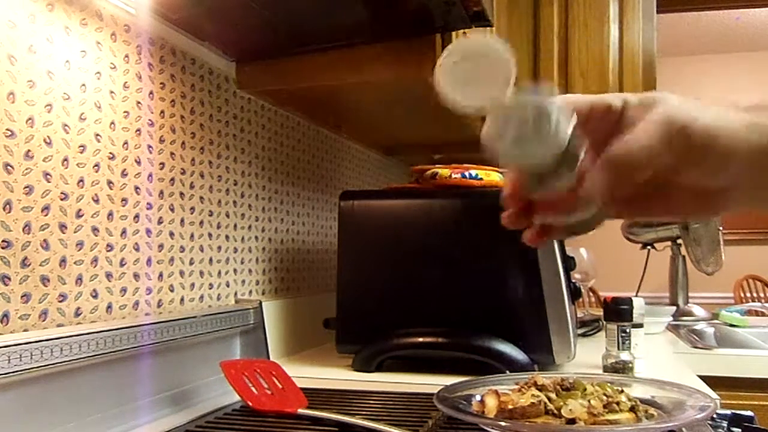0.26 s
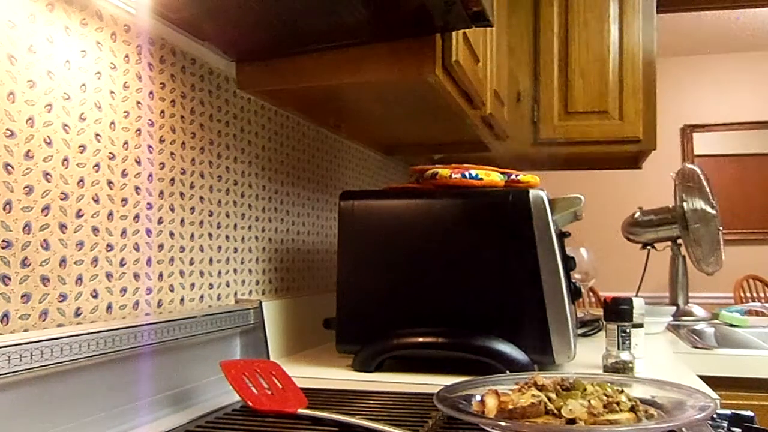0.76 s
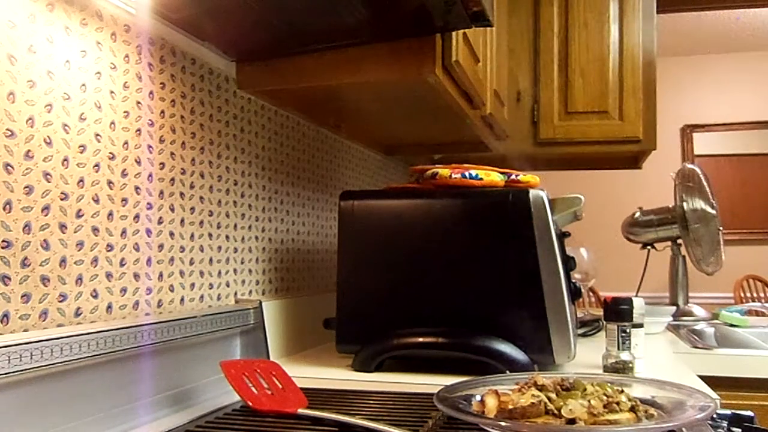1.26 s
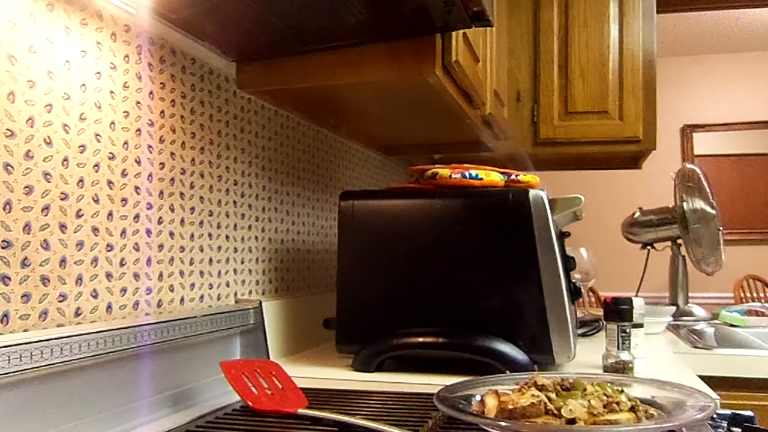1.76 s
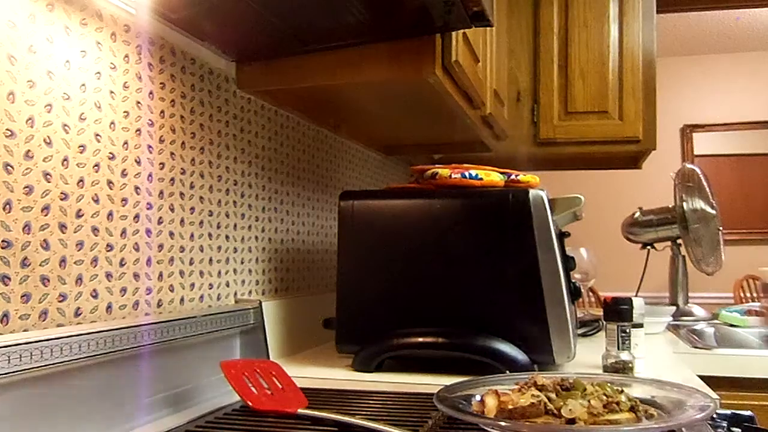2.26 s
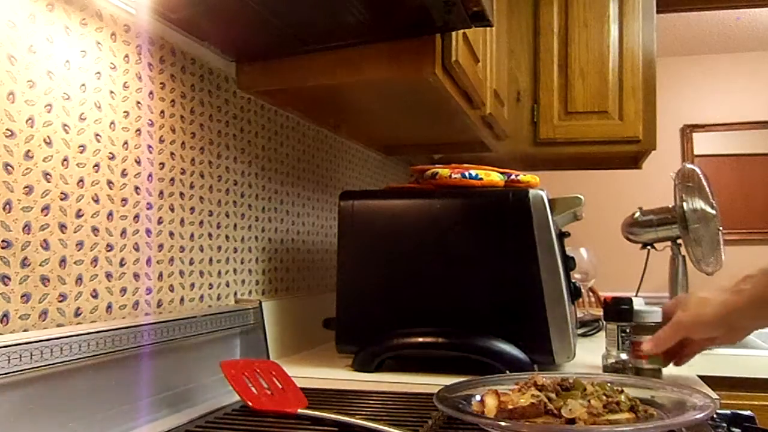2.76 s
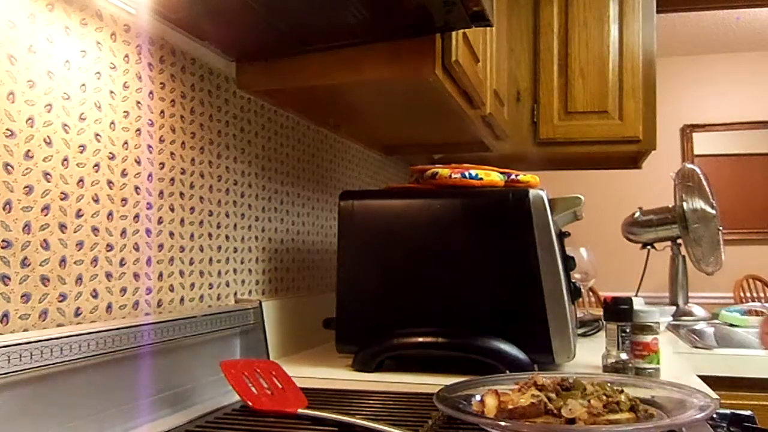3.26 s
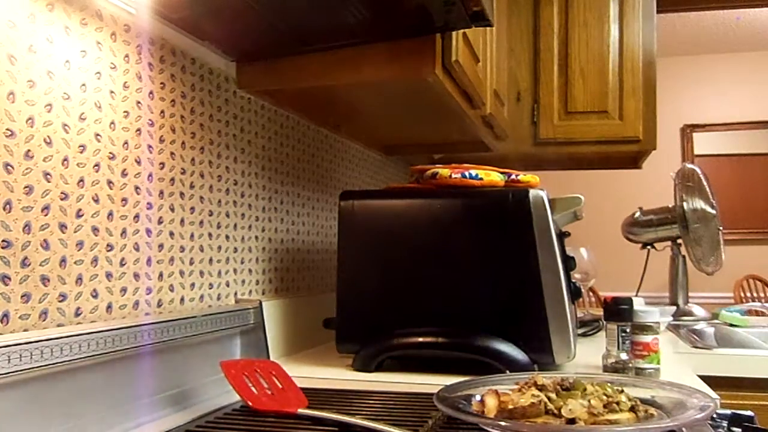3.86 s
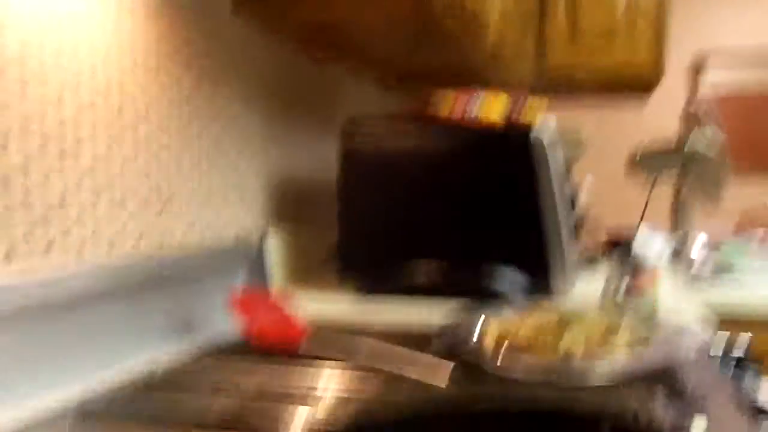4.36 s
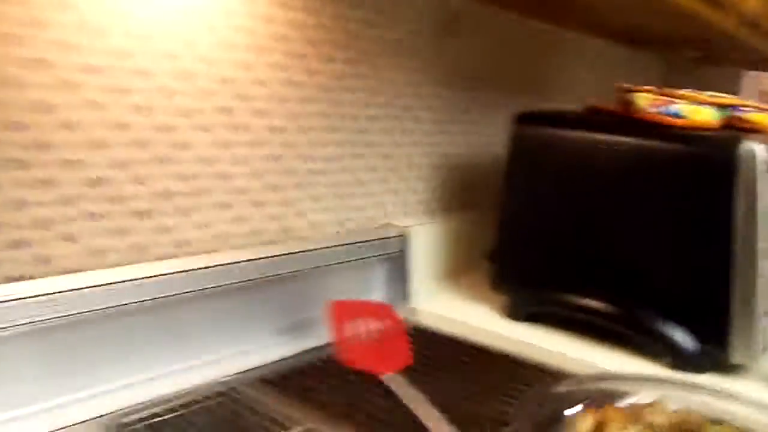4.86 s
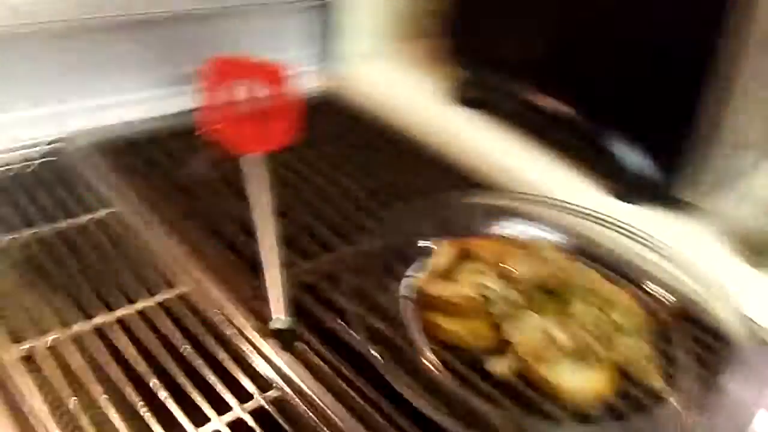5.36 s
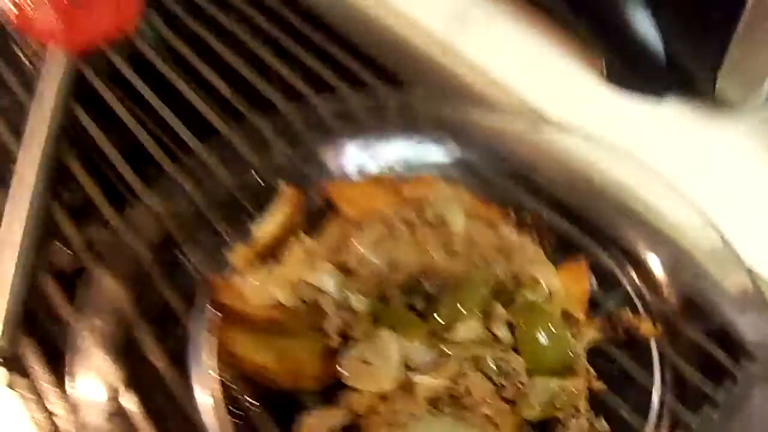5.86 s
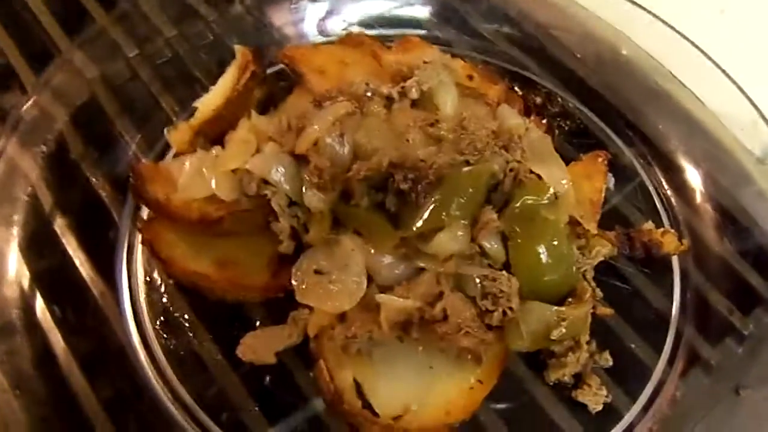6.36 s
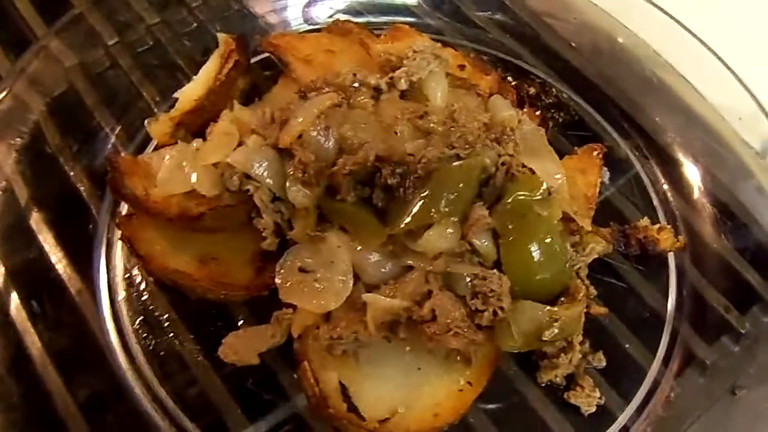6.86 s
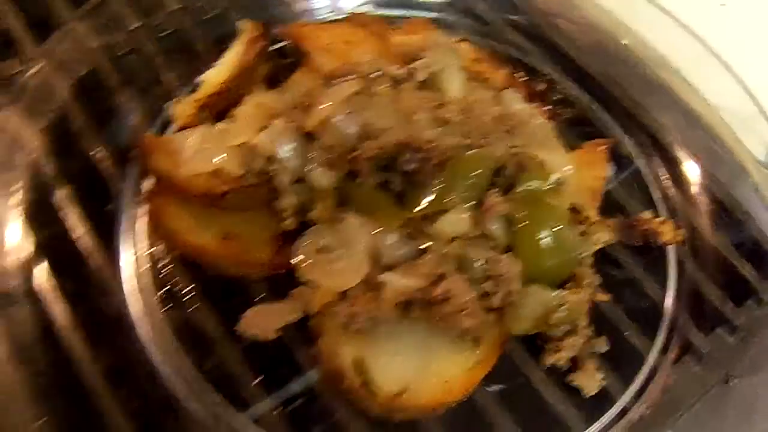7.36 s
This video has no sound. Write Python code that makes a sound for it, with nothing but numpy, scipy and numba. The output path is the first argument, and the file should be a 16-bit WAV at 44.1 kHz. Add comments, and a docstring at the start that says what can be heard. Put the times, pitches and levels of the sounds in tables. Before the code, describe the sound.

A kitchen fan hums steadily throughout, with a faint sizzle of eggs frying and a low rumble from the hand-held microphone. Fingers rustle softly on plastic at first. At about 0.9 seconds a spice shaker's lid snaps loudly close by, ringing briefly, and at 1.1 seconds it clicks shut; these are the loudest sounds. The background then dips and recovers by about 4 seconds. From 1.4 to 2.5 seconds trapped steam chatters faintly in the pan in quick, even puffs. At 2.6 seconds the shaker is set on the counter with a light knock and thud. Small spits of fat grow louder, several a second. From 4.2 to 6 seconds the microphone is carried over the stove, with rubs, sharp finger ticks and two dull bumps near 5.1 and 5.4 seconds. The spits turn brighter and continue over the hum until the end, at around 7.6 seconds.

```python
"""A kitchen fan hums and a hand-held camera rumbles; eggs sizzle faintly, steam spitting through the fat.
Fingers rustle. At 0.86 s a spice shaker's plastic lid snaps loudly, then clicks home close by; the
overload ducks the automatic gain for about 3 s. From 1.4 s trapped steam chatters in the pan, and at
2.6 s the shaker is set on the counter. The spits grow louder, several a second. From 4.25 s the camera
is carried over the stove, with rubs, ticks and two bumps, and the spits turn brighter."""
import sys
import numpy as np
from scipy import signal
from scipy.fft import rfft, irfft
from scipy.io import wavfile
from scipy.ndimage import uniform_filter1d
from numba import njit

SR = 44100
rng = np.random.default_rng(int(sys.argv[2]) if len(sys.argv) > 2 else 0)


def log_audio(samples):
    """Write samples as a 16-bit WAV file to the path given in sys.argv[1]."""
    # one column per channel
    frames = np.atleast_2d(samples).T
    # limit to full scale, then quantise
    limited = np.clip(frames, -1, 1)
    pcm = np.round(limited * 32767).astype(np.int16)
    wavfile.write(sys.argv[1], SR, pcm)


N = 335424
T = np.arange(N) / SR

# Kitchen reverberation. Each row: frequency in Hz, t60 in seconds.
ROOM_DECAY = [(100, 0.36), (500, 0.55), (2000, 0.47), (4000, .48), (8000, 0.43), (14000, 0.37)]
# Fan tones. Each row: multiple of the shaft rate, level by the counter in dB, level over the stove in dB.
FAN_HARMONICS = [(1, -16.5, -14), (9, -19, -11), (10, -8, -28), (11, -14, -32), (12, -16.5, -31),
                 (14, -28.5, -23), (17, -17.5, -18.5), (18, -19, -26)]
# Noise colours. Each row: frequency in Hz, relative spectral density in dB.
FAN_AIR_COLOUR = [(20, -1), (45, -1), (100, -3.5), (250, -5.5), (400, -1.5), (520, -6), (700, -7.5),
                  (900, -11), (1100, -10.5), (1400, -22), (2500, -24.5), (8000, -46.5)]
SIZZLE_COUNTER_COLOUR = [(500, -23.5), (1300, -5.5), (1750, 2), (2400, -0.5), (4200, 1), (5500, -5.5),
                         (9000, -6.5), (14000, -9.5)]
SIZZLE_STOVE_COLOUR = [(500, -17.5), (1300, 0), (1750, 0.5), (4200, -1.5), (5500, -2.5), (9500, -5),
                       (14000, -5)]
MIDDLE_COLOUR = [(300, -31), (1100, 0.5), (1650, 2), (2200, -3), (3100, -0.5), (4200, -4), (5500, -5.5),
                 (12000, -37.5)]
TREBLE_COLOUR = [(1500, -36), (4000, -7), (5500, -2.5), (7500, -3), (10000, -3.5), (12000, -9),
                 (14000, -16)]
SNAP_COLOUR = [(50, -31), (150, -19.5), (240, -3.5), (350, 3.5), (540, -7.5), (800, -4.5), (1400, -4),
               (2100, -1.5), (3000, -4.5), (3800, 8), (4250, 1), (4900, -6.5), (5800, -7), (7200, -8),
               (10500, -5.5), (14000, -12)]
CLICK_COLOUR = [(50, -21), (200, -5.5), (460, -1), (800, -6), (1600, 2.5), (2400, 0), (3000, -6.5),
                (3700, 0), (5000, -5), (7000, -10), (9000, -11.5), (14000, -21)]
KNOCK_COLOUR = [(50, -30), (300, -12), (900, -8), (1250, -13), (1600, 1.5), (2400, -13), (2800, 2),
                (3100, 9), (3400, -5), (3800, -1), (4800, -10), (6200, -17), (7700, -14.5), (14000, -33)]
THUD_COLOUR = [(50, -14), (130, -14), (200, -3), (300, -5), (400, -6), (520, 4), (800, -19), (1500, -25)]
# Hand on shaker and camera. Each row: peak time in seconds, level in dB, half length in seconds,
# treble over middle in dB.
HAND_RUSTLES = [(0.14, -46, .014, 0), (0.368, -42.3, 0.026, 7), (.607, -44, .014, -7),
                (.685, -49, 0.014, 3), (0.835, -45.5, .02, -6), (4.28, -50, .048, -8),
                (5.223, -45.5, .047, 2), (5.365, -36, 0.032, 2.5), (5.997, -44.5, .06, 9)]
# Clear spits of fat. Each row: time in seconds, level in dB, spray from 0 (big bubble) to 1 (fine jet).
CLEAR_SPITS = [(1.293, -44.5, 0.043), (1.558, -46, .1), (1.9727, -48, 0.15), (2.1937, -50.5, .1),
               (2.4571, -48.5, .1), (2.89, -49, .4), (2.9802, -41, 0), (3.171, -41.5, 0.038),
               (3.3465, -49.5, 0.41), (3.474, -41.5, 0.086), (3.7557, -41, 0.03), (3.9507, -42, 0),
               (4.029, -45.5, 0.092), (4.256, -42, 0), (4.451, -43.5, 0.076), (4.6554, -43.5, .1),
               (4.906, -43.5, 0.22), (4.9949, -46, 0.045), (5.2706, -44, 0), (5.468, -43, 0.086),
               (5.622, -41.5, 0.063), (5.8533, -40.5, 0.21), (6.0879, -40, 0.25), (6.3093, -41.5, 1),
               (6.349, -45.5, 0), (6.422, -46.5, 0.056), (6.5473, -42, 0.8), (6.708, -43, 0),
               (6.7665, -44, 0.98), (7.0045, -37, 0.38), (7.2253, -42.5, 0.92), (7.384, -43, 0),
               (7.463, -43.5, 0.46), (7.574, -47.5, 0.37)]
# Pan resonances. Each row: frequency in Hz, bandwidth in Hz, gain in dB.
PAN_RESONANCES = [(1705, 78, 1), (2235, 94, 4), (2720, 320, 0), (3120, 55, 0), (3800, 140, -3.5),
                  (6720, 100, 3), (7440, 96, 0.5), (7970, 110, -0.5), (10900, 91, -11.5)]
# Modes of the shaker's lid and jar. Each row: frequency in Hz, relative level in dB, t60 in seconds.
LID_RING = [(252, 2, .06), (366, 3, .13), (2435, -12, .45), (2630, -8, .27), (2887, -9, .27),
            (3230, -13, .35), (3315, -5, .24), (3558, -11, .3), (3690, 6, .26), (3845, -3, .42),
            (3938, 4, .27), (4147, 1, .3), (4335, -7, .26), (9846, -6, .16), (10141, -6, .16)]
JAR_RING = [(183, -11, .2), (256, -5, .17), (334, -8, .2), (510, 0, .15), (705, -11, .15), (1604, -2, .12),
            (2847, -4, .09), (3006, -3, .1), (3044, 4, .12), (3113, -3, .13), (3757, -1, .1),
            (4134, -8, .09), (7700, -12, .04)]
# Taps on the camera body. Each row: start in seconds, level in dB, pitch in Hz, t60 in seconds.
FINGER_TICKS = [(4.2432, -29.5, 1600, 0.02), (4.683, -30, 4200, 0.0087), (4.8115, -35, 4200, 0.006),
                (5.0706, -28, 3300, 0.012), (5.1772, -23, 4800, 0.008), (5.606, -28.5, 2350, 0.012)]
BODY_BUMPS = [(5.0707, -18, 95, 0.03), (5.365, -14, 138, 0.021)]


def undb(db):
    return 10 ** (np.asarray(db) / 20)


def unit_rms(x):
    return x / np.sqrt(np.mean(x ** 2))


def fade(t, t60_s):
    return undb(-60 * t / t60_s)


def add(out, start_s, x):
    i = int(start_s * SR)
    out[i:i + len(x)] += x[:N - i]


def tint(x, colour, size=4096):
    """Minimum-phase colour filter that keeps the power of white noise."""
    hz, db = np.transpose(colour)
    bins_hz = np.maximum(np.fft.rfftfreq(size, 1 / SR), 1)
    gain = undb(np.interp(np.log(bins_hz), np.log(hz), db))
    cepstrum = irfft(np.log(gain))
    cepstrum[1:size // 2] *= 2
    cepstrum[size // 2 + 1:] = 0
    response = irfft(np.exp(rfft(cepstrum)))
    return signal.fftconvolve(x, response / np.linalg.norm(response))[:len(x)]


def drift(rate_hz):
    """Smooth random curve, unit RMS."""
    hold = int(SR / rate_hz)
    steps = np.repeat(rng.standard_normal(N // hold + 1), hold)
    return unit_rms(uniform_filter1d(uniform_filter1d(steps, hold), hold)[:N])


def crackle(rate_hz, spread_db):
    """Random impulses; the spread makes a few far louder."""
    size = undb(spread_db * np.minimum(rng.exponential(size=N), 5))
    return unit_rms((rng.random(N) < rate_hz / SR) * size * rng.standard_normal(N))


def split_power(power, treble_db):
    """Middle and treble shares of a power curve."""
    middle_share = 1 / (1 + undb(treble_db) ** 2)
    return np.outer([middle_share, 1 - middle_share], power)


def hiss(powers, rate_hz, spread_db):
    """Fine grains following a middle and a treble power curve."""
    return sum(tint(np.sqrt(power) * crackle(rate_hz, spread_db), colour)
               for power, colour in zip(powers, (MIDDLE_COLOUR, TREBLE_COLOUR)))


def kitchen(x, wet_db, gap_s=0.0025):
    """Direct sound plus a diffuse tail, longest in the mids."""
    hz, t60_s = np.transpose(ROOM_DECAY)
    bins_hz, frames_s, cells = signal.stft(rng.standard_normal(SR), SR)
    cells *= fade(frames_s, np.interp(bins_hz, hz, t60_s)[:, None])
    tail = signal.istft(cells, SR)[1][:SR] * np.clip(T[:SR] / gap_s - 1, 0, 1)
    return x + undb(wet_db) * signal.fftconvolve(x, tail / np.linalg.norm(tail))[:len(x)]


def camera_move(start_s=4.25, length_s=1.1):
    """Place (0 by the counter, 1 over the stove) and speed (0 to 1)."""
    angle = np.pi * np.clip((T - start_s) / length_s, 0, 1)
    return (1 - np.cos(angle)) / 2, np.sin(angle)


def fan(place, shaft_hz=37.45, repeat=0.42, whistle_hz=7860):
    """Turbulence that partly repeats each turn, shaft harmonics and a faint whistle."""
    turn_delay = np.exp(-2j * np.pi * np.fft.rfftfreq(N, 1 / SR) / shaft_hz)
    turbulence = irfft(rfft(rng.standard_normal(N)) / (1 - repeat * turn_delay), N)
    air = unit_rms(tint(turbulence, FAN_AIR_COLOUR))
    angle = 2 * np.pi * np.cumsum(shaft_hz * (1 + 0.00397 * drift(3))) / SR
    air *= 1 + 0.21 * np.cos(angle)
    tones = np.zeros(N)
    for multiple, counter_db, stove_db in FAN_HARMONICS:
        level_db = counter_db + (stove_db - counter_db) * place + 2.5 * drift(8.3)
        tones += undb(level_db) * np.cos(multiple * angle + 0.59 * drift(25))
    whistle = undb(-30) * drift(150) * np.sin(2 * np.pi * whistle_hz * T)
    return undb(-1) * air + np.sqrt(2) * tones + whistle


def sizzle(place, flare_rate_hz=16, flare_depth=0.55, flare_t60_s=0.045):
    """Minute bubbles burst in a bed that flares briefly; its colour follows the camera's place."""
    starts = (rng.random(N) < flare_rate_hz / SR) * np.minimum(rng.exponential(size=N), 2)
    flares = signal.fftconvolve(starts, fade(T[:SR // 10], flare_t60_s))[:N]
    grains = crackle(rate_hz=6000, spread_db=2.5) * (1 + flare_depth * flares) * undb(0.5 * drift(9.4))
    bed = (1 - place) * tint(grains, SIZZLE_COUNTER_COLOUR) + place * tint(grains, SIZZLE_STOVE_COLOUR)
    return unit_rms(kitchen(bed, wet_db=-1.5))


def hand_rumble(place, speed, rest_db=-52.5, reach_db=3.2, carry_db=5):
    """The hand shakes the camera body, more with the arm stretched or moving."""
    colour = [(20, -5.5), (60, -0.5), (160, -5.5), (300, -10), (800, -11), (2000, -31.5)]
    rumble = tint(rng.standard_normal(N), colour)
    return rumble * undb(rest_db + reach_db * place + carry_db * speed + 2 * drift(9))


def rustles():
    """Skin slides over plastic in short smooth swells."""
    powers = sum(split_power(undb(db) ** 2 * np.exp(-((T - peak_s) / half_s) ** 2), treble_db)
                 for peak_s, db, half_s, treble_db in HAND_RUSTLES)
    friction = hiss(powers, rate_hz=22000, spread_db=1)
    return kitchen(tint(friction, [(1000, -1), (8000, 0.5), (13000, 5.5)]), wet_db=-8)


def faint_spits(rate_hz=2.5, mean_db=-53.5, spread_db=1.5):
    """Random small spits, as rows like CLEAR_SPITS."""
    wait, size, spray = rng.random((60, 3)).T
    times_s = np.cumsum(2 * wait / rate_hz)
    levels_db = mean_db + spread_db * (2 * size - 1)
    return [row for row in zip(times_s, levels_db, spray) if 0.01 < row[0] < T[-1]]


def pan(x):
    """The pan rings with bursts inside it."""
    return sum(undb(db) * signal.lfilter(*signal.iirpeak(hz, hz / width_hz, SR), x)
               for hz, width_hz, db in PAN_RESONANCES)


def spits(place, ear_window_s=0.021, escape_t60_s=0.076, lead_s=0.002, ping_hz=3020, stove_db=7.5):
    """Steam breaks through the fat: a grainy burst and a bubble ping. Fine jets are short and bright."""
    powers, pings, t = np.zeros((2, N)), np.zeros(N), T[:SR // 10]
    pop = 1 + 0.96 * fade(t, t60_s=0.018)
    for time_s, db, spray in CLEAR_SPITS + faint_spits():
        length_s = 0.015 / 2 ** (1.6 * spray)
        # Over the stove the pan's rim no longer shades the treble.
        treble_db = -6.5 + 17 * spray + stove_db * place[int(time_s * SR)]
        power = (pop * fade(np.maximum(t - length_s, 0), escape_t60_s)) ** 2
        energy = undb(db) ** 2 * ear_window_s * SR
        for register, part in zip(powers, split_power(energy * power / power.sum(), treble_db)):
            add(register, time_s - lead_s, part)
        pitch_hz = ping_hz * (1 + 0.03 * rng.standard_normal())
        ping = fade(t, t60_s=0.025) * np.sin(2 * np.pi * pitch_hz * t)
        middle_share = 1 / (1 + undb(treble_db) ** 2)
        add(pings, time_s - lead_s, undb(db + 7) * middle_share * ping)
    bursts = hiss(powers, rate_hz=6000, spread_db=0)
    return kitchen(bursts + undb(-1.5) * pan(bursts) + pings, wet_db=-6.5)


def impact(start_s, colour, db, t60_s, scatter_db, scatter_t60_s, wet_db, attack_s=0.0008):
    """A sharp crack, then its scatter off cabinets and counter."""
    out, t = np.zeros(N), T[:SR // 2]
    decay = fade(t, t60_s) + undb(scatter_db) * fade(t, scatter_t60_s)
    burst = decay * np.minimum(t / attack_s, 1) * np.sign(rng.standard_normal(len(t)))
    add(out, start_s, undb(db) * tint(burst, colour))
    return kitchen(out, wet_db)


def ring(start_s, modes, db):
    """Struck modes decay as sines."""
    out, t = np.zeros(N), T[:SR]
    for hz, mode_db, t60_s in modes:
        add(out, start_s, undb(db + mode_db) * fade(t, t60_s) * np.sin(2 * np.pi * hz * t))
    return out


def shaker(snap_s=0.8572, click_s=1.0627, down_s=2.6146, counter_lag_s=0.00702):
    """The lid snaps and clicks home; the jar knocks on the counter, which answers with a thud."""
    snap = impact(snap_s, SNAP_COLOUR, db=0.5, t60_s=0.058,
                  scatter_db=-16.5, scatter_t60_s=0.14, wet_db=-8)
    click = impact(click_s, CLICK_COLOUR, db=2, t60_s=0.011,
                   scatter_db=-14, scatter_t60_s=0.095, wet_db=-14)
    knock = impact(down_s, KNOCK_COLOUR, db=-20, t60_s=0.041,
                   scatter_db=-6.5, scatter_t60_s=0.35, wet_db=-9)
    thud = impact(down_s + counter_lag_s, THUD_COLOUR, db=-32, t60_s=0.13,
                  scatter_db=-5.5, scatter_t60_s=0.22, wet_db=-9)
    lid = ring(snap_s, LID_RING, db=-22) + ring(click_s, LID_RING, db=-44)
    jar = ring(down_s, JAR_RING, db=-25)
    return snap + click + knock + thud + kitchen(lid + jar, wet_db=-13)


def steam_chatter(start_s=1.415, rate_hz=19.3, count=22, run_db=-53.5, jitter_s=0.002):
    """Trapped steam escapes in a nearly even run of faint puffs that ring the pan."""
    power, t = np.zeros(N), T[:SR // 10]
    for k, (late, size) in enumerate(rng.standard_normal((count, 2))):
        puff = undb(2 * size) * fade(t, t60_s=0.085)
        add(power, start_s + k / rate_hz + jitter_s * late, puff ** 2)
    puffs = hiss(split_power(power, treble_db=-7.5), rate_hz=9700, spread_db=1)
    sound = kitchen(pan(puffs) + undb(-11.5) * puffs, wet_db=-10)
    duty = count / rate_hz / T[-1]
    return undb(run_db) * unit_rms(sound) * np.sqrt(duty)


def camera_taps():
    """Sharp finger ticks and dull bumps on the camera body."""
    ticks, t = np.zeros(N), T[:SR // 20]
    for start_s, db, hz, t60_s in FINGER_TICKS:
        colour = [(hz / 4, -9), (hz, 0), (hz * 1.6, -6), (hz * 4, -13)]
        burst = fade(t, t60_s) * np.sign(rng.standard_normal(len(t)))
        add(ticks, start_s, undb(db) * tint(burst, colour))
    bumps = sum(ring(start_s, [(hz, 0, t60_s)], db) for start_s, db, hz, t60_s in BODY_BUMPS)
    return kitchen(ticks, wet_db=-13) + bumps


def scene():
    """Mono mix at the moving camera."""
    place, speed = camera_move()
    bed = undb(-41.5) * fan(place) + undb(-53 + 0.9 * place) * sizzle(place) + hand_rumble(place, speed)
    events = rustles() + spits(place) + shaker() + steam_chatter() + camera_taps()
    return (bed + events)[None]


@njit
def duck_db(overloaded, depth_db, attack_s, hold_s, release_s):
    """Automatic gain: drops after an overload, holds, climbs back."""
    gain_db, cut, since_s = np.zeros(len(overloaded)), 0., 1e9
    for i in range(len(overloaded)):
        since_s = 0. if overloaded[i] else since_s + 1 / SR
        if since_s < hold_s:
            cut = min(cut + 1 / (attack_s * SR), 1.)
        else:
            cut = max(cut - 1 / (release_s * SR), 0.)
        gain_db[i] = -depth_db * cut
    return gain_db


def record(dry):
    """Gain ducking, peak saturation, low-pass."""
    threshold, ceiling, cutoff_hz = 0.9, 0.7, 14050
    overloaded = np.abs(dry[0]) > threshold
    ducked = dry * undb(duck_db(overloaded, depth_db=7.0, attack_s=0.073, hold_s=2.164, release_s=1.0))
    saturated = ducked / (1 + (ducked / ceiling) ** 6) ** (1 / 6)
    return signal.fftconvolve(saturated, signal.firwin(301, cutoff_hz, fs=SR)[None], "same")


dry = scene()
out = record(dry)
log_audio(out)
```